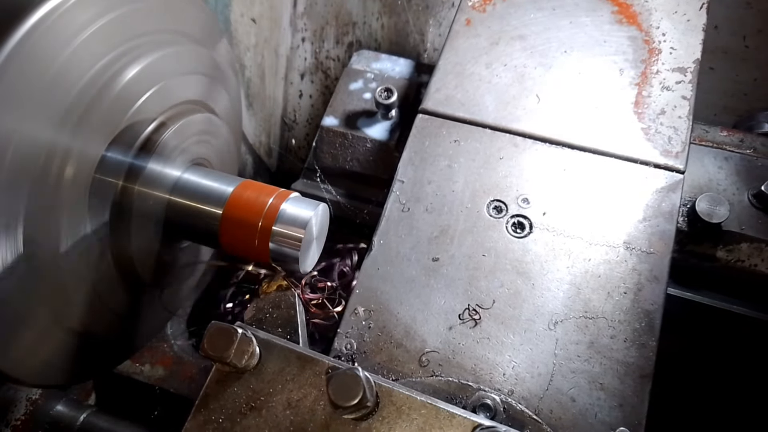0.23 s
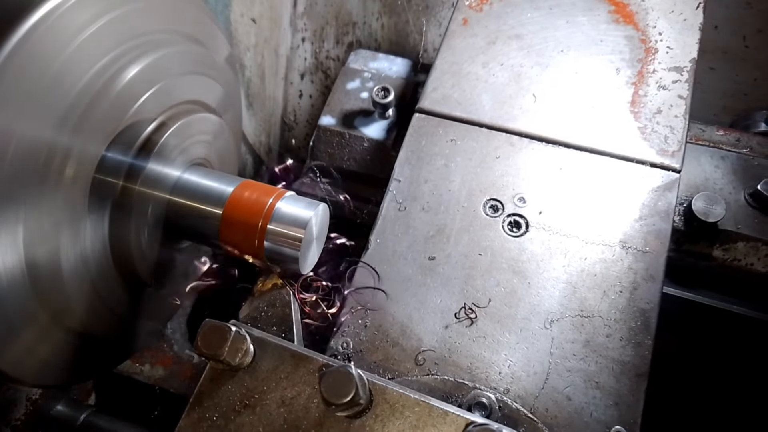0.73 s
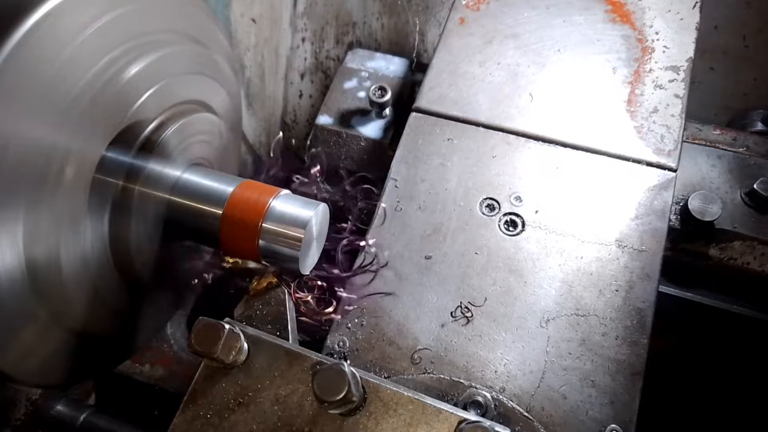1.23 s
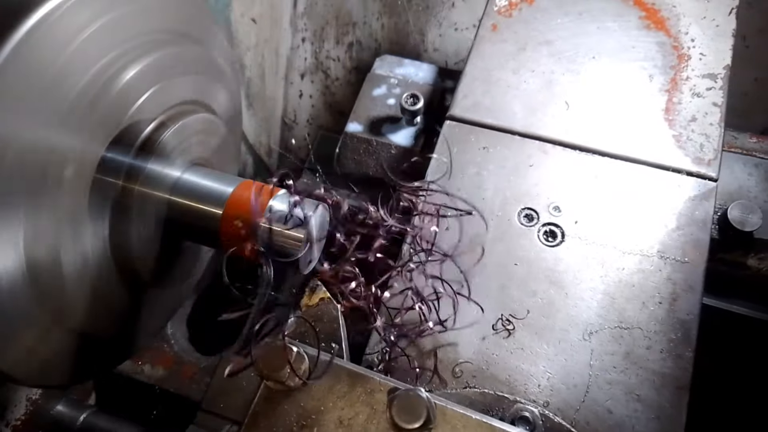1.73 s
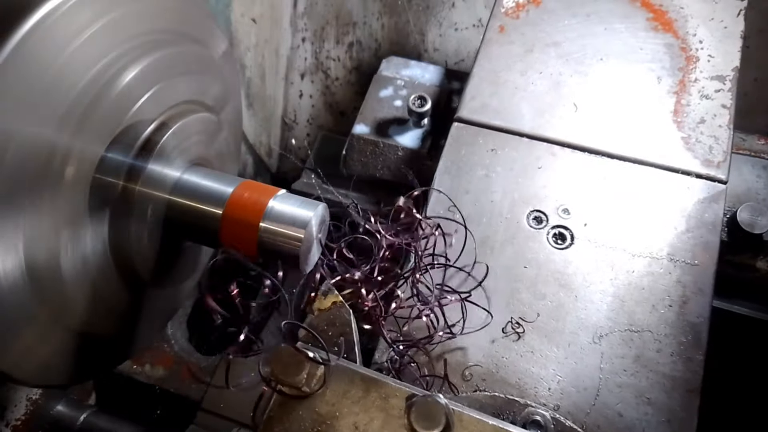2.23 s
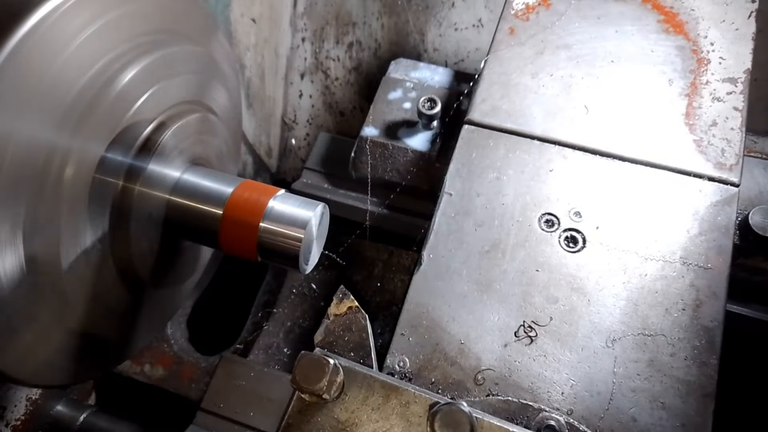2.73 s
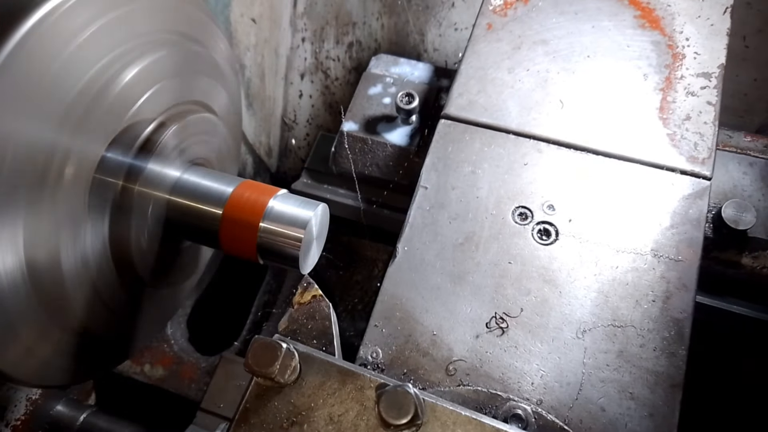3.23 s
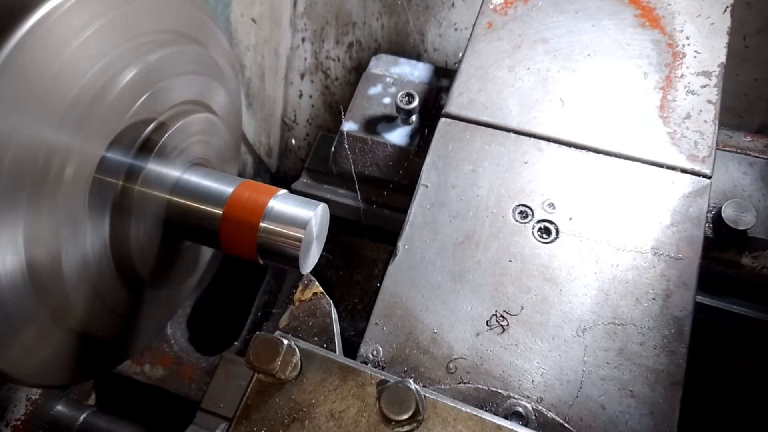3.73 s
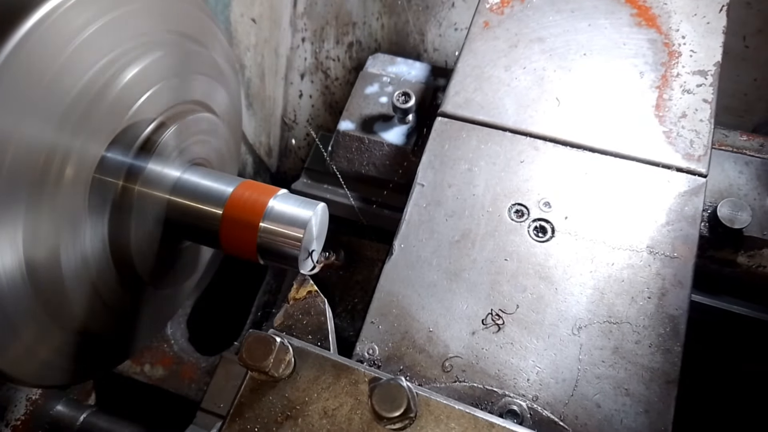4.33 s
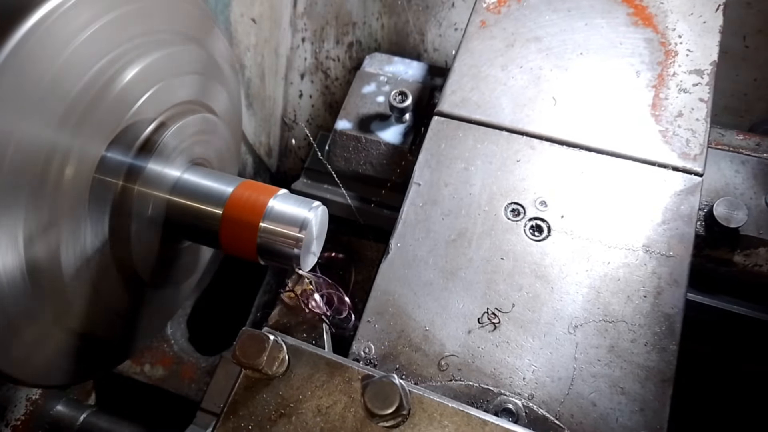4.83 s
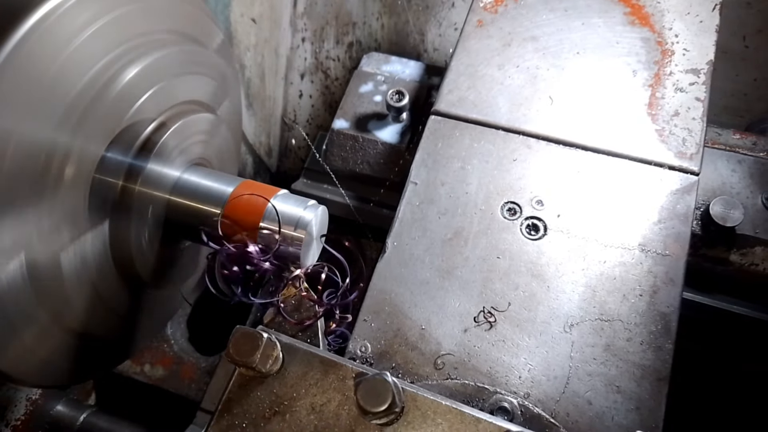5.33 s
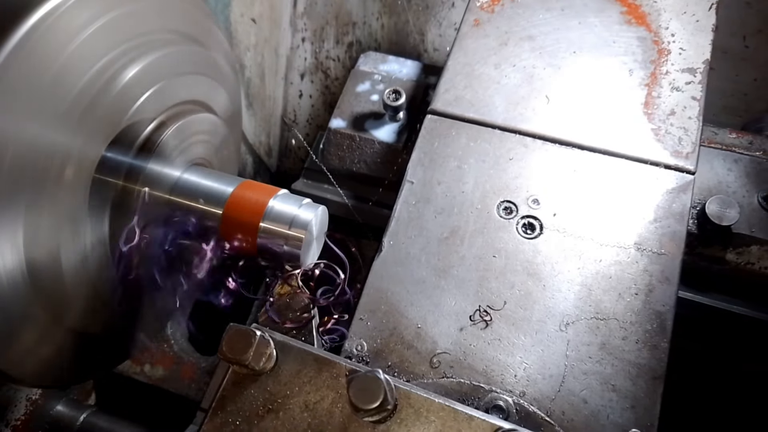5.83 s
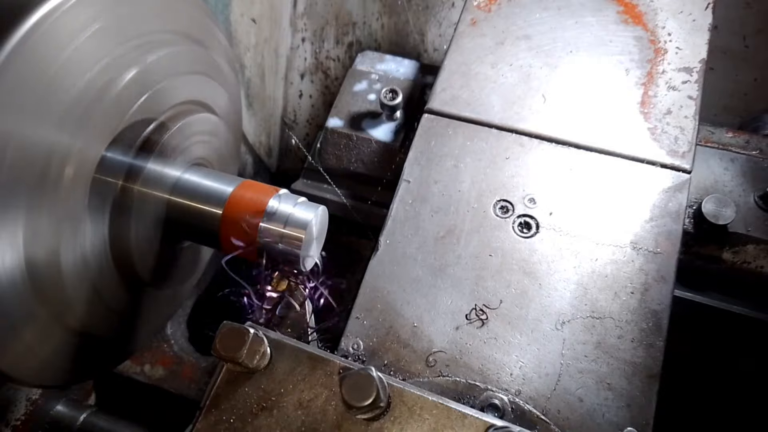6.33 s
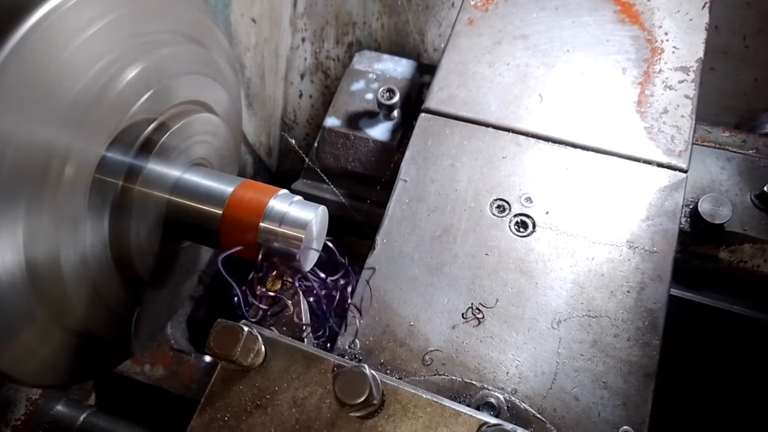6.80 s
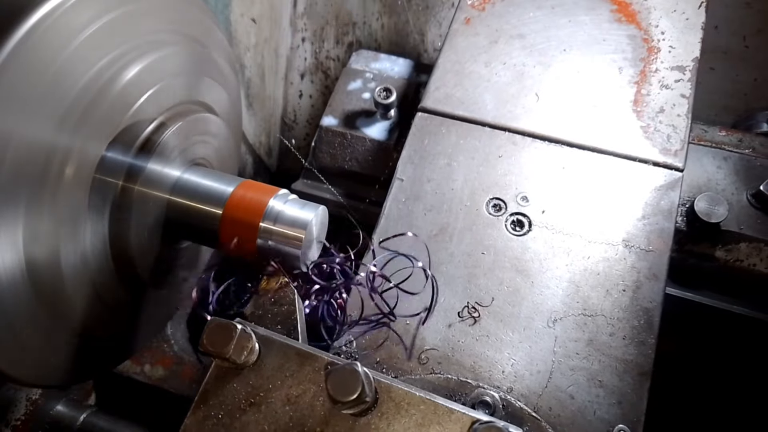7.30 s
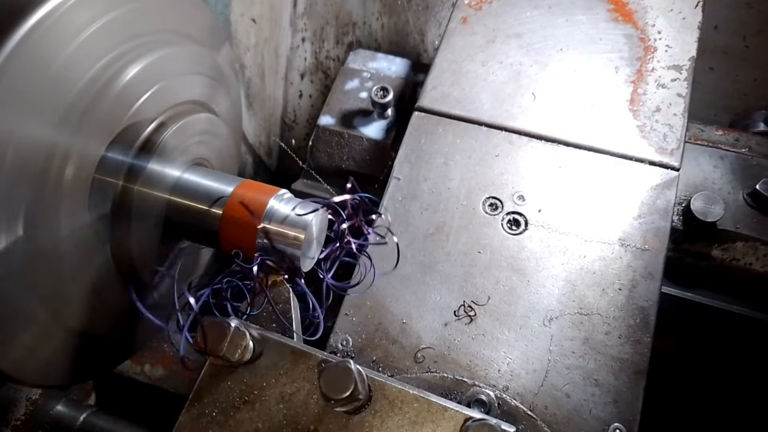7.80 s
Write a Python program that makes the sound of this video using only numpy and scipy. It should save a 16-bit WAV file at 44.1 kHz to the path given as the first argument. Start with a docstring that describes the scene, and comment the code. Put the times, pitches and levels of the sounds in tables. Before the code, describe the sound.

Close microphone on a workshop lathe, centred and without noticeable room echo. Steel shears with dense sizzling friction, gear whine and rapid once-per-turn knocks. Sudden silence is followed by under a second of low, humming machine rumble ending with light swarf ticks. After another short gap the loud, gritty cutting snaps back in, pulsing and ringing, easing slightly late on.

```python
"""Metal lathe turning steel

A lathe heard close up in mono: cutting, a low machine roar of under a second, silence, then cutting again.
Cutting is coloured noise for the chip, sine lines for the gears, and modes struck once a turn for the knock,
with a loose ringing and a few faint thumps. The roar is rumbling noise and hums, with two ticks of swarf.
Both passages of cutting share one sound: the first enters part-way through it, the second plays it whole."""
import sys
import numpy as np
from scipy import signal
from scipy.fft import rfft, irfft
from scipy.io import wavfile

SR = 44100
rng = np.random.default_rng(int(sys.argv[2]) if len(sys.argv) > 2 else 0)


def log_audio(samples):
    """Write samples as a 16-bit WAV file to the path given in sys.argv[1]."""
    # one column per channel
    frames = np.atleast_2d(samples).T
    # limit to full scale, then quantise
    limited = np.clip(frames, -1, 1)
    pcm = np.round(limited * 32767).astype(np.int16)
    wavfile.write(sys.argv[1], SR, pcm)


N = 355443
TIME = np.arange(N + SR) / SR  # s, with a second to spare
FREQ = np.fft.rfftfreq(len(TIME), 1 / SR)  # Hz
SHAFT_HZ = 26.172  # turns per second


def gain_of(db):
    """Decibels to gain."""
    return 10 ** (np.asarray(db) / 20)


def evened(x):
    """Scales to rms 1."""
    return x / np.sqrt(np.mean(x ** 2) + 1e-20)


def filtered(x, gain):
    """Applies a gain given for every frequency."""
    return irfft(rfft(x) * gain, len(x))


def white():
    """White noise of rms 1."""
    return rng.standard_normal(len(TIME))


def wander(hz):
    """Slow random drift of rms 1, with rates up to about hz."""
    t = TIME[::64]
    rate = np.fft.rfftfreq(len(t), t[1])
    drift = filtered(rng.standard_normal(len(t)), np.exp(-(rate / hz) ** 2))
    return np.interp(TIME, t, evened(drift))


def colour(spectrum, resonances):
    """Gain that gives white noise a smooth spectrum with resonant bumps on it."""
    hz, db = np.transpose(spectrum)
    level = np.interp(np.log(FREQ + 1), np.log(hz), db)
    for f, width, lift in resonances:
        level = level + lift / (1 + (2 * (FREQ - f) / width) ** 2)
    return gain_of(level) * np.sqrt(SR / 2)


def lifts(events):
    """A bell-shaped rise in dB for each event; its length is the width at half height."""
    return sum(db * .5 ** ((2 * (TIME - s) / length) ** 2) for s, length, db in events)


def between(start, end):
    """An abrupt gate: 1 inside the span, 0 outside, with 32-sample ramps."""
    return np.clip(np.minimum(TIME - start, end - TIME) * SR / 32, 0, 1)


# base spectrum of the cutting hiss, before resonances and band levels: [f/Hz, level/dB per Hz]
HISS_SPECTRUM = [(25, -82), (65, -83.5), (120, -104), (170, -101), (230, -84), (400, -79.5), (560, -84.5),
                 (850, -79.5), (1050, -71), (1900, -70.5), (2600, -70.5), (5000, -67), (8800, -71),
                 (15500, -74)]
# resonances of bar, tool and chuck that lift the hiss: [f/Hz, width/Hz, lift/dB]
STEEL_RESONANCES = [(1358, 84, 2), (1540, 290, 3), (2108, 57, 6), (2288, 160, 9), (2514, 49, 11),
                    (2660, 102, 8.5), (2760, 130, 4), (2856, 163, 12), (3192, 150, 7), (3304, 57, 5),
                    (3830, 150, 6), (4044, 143, 8), (4335, 250, 5.5), (4620, 53, 9.5), (4800, 195, 4),
                    (5080, 48.7, 6.5), (5240, 92, 3), (5730, 490, 7), (6440, 112, 6.5), (6750, 150, 3.5),
                    (7181, 260, 2.5), (8060, 94, 8.5), (8250, 89, 3.5), (9920, 396, 3.6)]
# level of the steel's ring near 4 kHz, before its waver: [t/s, level/dB]
HIGH_RING_LEVEL = [(4.5, 1), (5.35, 0.5), (5.6, 1), (5.9, 1), (6.35, -0.5), (6.75, 1), (7.05, 0.5),
                   (7.3, 2.5), (7.8, 1.5), (8.4, 0.5)]


def chip(turns, flutter_db=0.36, bite_db=2.7, low_ring_db=0.68, low_waver_db=0.6,
         high_waver_db=0.34, treble_db=-0.3, treble_waver_db=0.24):
    """Shearing steel: dense friction noise rings the bar and the tool, unevenly as the chip curls."""
    friction = white() * gain_of(flutter_db * wander(45))
    hiss = filtered(friction, colour(HISS_SPECTRUM, STEEL_RESONANCES))
    low_db = low_ring_db + low_waver_db * wander(22)
    high_db = np.interp(TIME, *np.transpose(HIGH_RING_LEVEL)) + high_waver_db * wander(4.7)
    # the fizz is strongest at each blow of the shaft, then fades over the turn
    bite = np.exp(-(turns % 1) / 0.34) - .25
    fizz_db = treble_db + treble_waver_db * wander(8) + bite_db * bite
    # overlapping bands that add up to the whole hiss
    centres_hz = [2200, 2800, 4050, 5000]
    shares = np.eye(len(centres_hz))
    bands = [filtered(hiss, np.interp(FREQ, centres_hz, share)) for share in shares]
    return sum(band * gain_of(db) for band, db in zip(bands, [0, low_db, high_db, fizz_db]))


MESH_HZ = 153.13  # tooth rate
# gear whine, before the whine trim: [multiple of the tooth rate, rms level/dB]
GEAR_LINES = [(6, -56.9), (9, -46.7), (11, -50.2), (12, -50.6), (13, -53.0), (15, -50.2), (17, -52.2),
              (18, -44.4), (19, -47.6), (21, -44.9), (25, -49.8), (26, -47.2), (27, -38.9), (31, -45.3),
              (32, -54.9), (33, -44.7), (37, -50.8), (38, -49.0), (48, -58.9), (53, -53.1), (54, -47.1),
              (65, -55.6), (66, -58.4), (67, -58.8), (71, -58.1), (81, -59.4)]
# hums and thin whistles of the drive, before the whine trim: [f/Hz, rms level/dB]
DRIVE_WHISTLES = [(231, -65.5), (249, -66), (366.4, -58), (497.3, -65), (575.8, -64), (654.3, -64.5),
                  (1908, -58), (2467, -58.5), (3005, -48), (4007, -45), (8032, -52), (8058.5, -52),
                  (8084.5, -53), (8110.5, -54.5)]


def whine(clock, waver_db=2., slip_cycles=.06, trim_db=.5):
    """Gear teeth mesh at a steady rate; every line wavers in strength and phase, high ones more in phase."""
    gears = [(k * MESH_HZ, db) for k, db in GEAR_LINES]
    out = 0
    for hz, db in [*gears, *DRIVE_WHISTLES]:
        slip = slip_cycles * np.sqrt(hz / 4000) * wander(5.5)
        cycles = hz * clock + slip + rng.random()
        strength = evened(gain_of(waver_db * wander(14)))
        out = out + gain_of(db + trim_db) * strength * np.sin(2 * np.pi * cycles)
    return np.sqrt(2) * out  # sine peak to rms


# the knock swells and eases a few times a second, and weakens late in the cut
SWELL_HZ, SWELL_AT_S, SWELL_DB = 2.93, 4.765, 0.45
EASE_FROM_S, EASE_DB_PER_S = 6.85, 0.9
# modes the shaft's knock rings, before the force of the blow:
# [f/Hz, rms level/dB, delay of the peak/s, bell half length (one sigma)/s]
KNOCK_MODES = [(403, -57, 0.0068, .0035), (745, -61, 0.00702, 0.00091), (872, -64.5, 0.00684, 0.0022),
               (1114, -42.5, .007, 0.0028), (1060, -55, .017, 0.0015), (1296, -49, .007, 0.0045),
               (1402, -55, 0.00511, 0.0017), (1533, -51, .01, 0.0022), (1967, -53, 0.0063, 0.0046)]


def knock(turns, uneven_db=1.1, trim_db=-0.34):
    """Once a turn the shaft knocks; each mode of the headstock swells and dies within the turn."""
    swell_db = SWELL_DB * np.cos(2 * np.pi * SWELL_HZ * (TIME - SWELL_AT_S))
    ease_db = EASE_DB_PER_S * np.maximum(TIME - EASE_FROM_S, 0)
    force = gain_of(trim_db + swell_db - ease_db + uneven_db * wander(27))
    blows = np.diff(np.floor(turns), prepend=np.floor(turns[0])) * force
    t = np.arange(-SR // 20, SR // 20) / SR
    ring = 0
    for hz, db, delay, length in KNOCK_MODES:
        bell = np.exp(-.5 * ((t - delay) / length) ** 2)
        mode = bell * np.cos(2 * np.pi * hz * (t - delay))
        ring = ring + gain_of(db) * mode / np.linalg.norm(mode)
    # scaled so that one blow a turn gives the rms levels of the table
    return signal.oaconvolve(blows, ring * np.sqrt(SR / SHAFT_HZ), "same")


# bouts in which the loose part rings louder: [middle t/s, length/s, lift/dB]
PING_BOUTS = [(4.5, .08, 6), (4.88, .12, 7.5), (5.12, .12, 5), (5.29, 0.071, 4), (5.79, .2, 7),
              (6.04, .15, 6.5), (6.39, .1, 7), (6.68, 0.071, 8), (6.87, .12, 8.5), (7.28, 0.1, 9),
              (7.54, .18, 4.5), (8.0, .11, 7.5), (8.27, .1, 4.5)]


def ping(turns, ping_hz=2160, ping_db=-43.5, peak_turn=.25, length_turns=.14, uneven_db=2.5,
         slip_cycles=0.054):
    """Something loose rings once a turn, in bouts, with chance changes of level and phase."""
    from_peak = (turns - peak_turn + .5) % 1 - .5  # turns
    swell = evened(np.exp(-.5 * (from_peak / length_turns) ** 2))
    cycles = ping_hz * from_peak / SHAFT_HZ + slip_cycles * wander(25)
    tone = np.sqrt(2) * np.cos(2 * np.pi * cycles)
    level_db = ping_db + lifts(PING_BOUTS) + uneven_db * wander(18)
    return gain_of(level_db) * swell * tone


# soft thumps under the cutting: [t/s, envelope peak level/dB]
SOFT_THUMPS = [(7.025, -52), (7.32, -57.5), (7.59, -50.5)]


def thumps(thump_hz=115, length_s=0.0032):
    """Now and then a dull, faint thump: a low sine inside a short bell."""
    out = 0
    for s, db in SOFT_THUMPS:
        bell = np.exp(-.5 * ((TIME - s) / length_s) ** 2)
        out = out + gain_of(db) * bell * np.sin(2 * np.pi * thump_hz * (TIME - s))
    return out


# shape of the low roar, levelled later: [f/Hz, relative level/dB per Hz]
ROAR_SPECTRUM = [(25, -54), (55, -67.5), (130, -53.5), (220, -53.5), (400, -56.5), (600, -53.5),
                 (1000, -55.0), (2000, -65.5), (2600, -70), (4400, -75.5), (5200, -81), (7500, -83),
                 (12500, -104.5), (15500, -91)]
# resonances of the housing that lift the roar: [f/Hz, width/Hz, lift/dB]
HOUSING_RESONANCES = [(280, 48, 6), (334, 34, 8), (430.7, 72, 15.5), (508, 31, 11.5), (744, 24, 5.5),
                      (807, 53, 6.5), (870, 36, 3), (1020, 38, 4.5), (1185, 49, 5), (1345, 14, 6.5),
                      (1610, 40, 6.5), (1697, 86, 3.5), (2010, 96, 5)]
# hums within the roar, before waver and surges: [f/Hz, rms level/dB]
ROAR_HUMS = [(290, -35), (452, -32), (526, -32.5), (747, -37.5), (806, -38.5), (874, -38.5)]
# surges of the roar: [middle t/s, length/s, lift/dB]
ROAR_SURGES = [(3.215, 0.033, 2.5), (3.262, 0.026, 4), (3.335, 0.038, 4.5), (3.478, 0.019, 3.5),
               (3.525, 0.019, 6), (3.645, 0.019, 7), (3.735, 0.036, 2), (3.785, 0.023, 1),
               (3.83, 0.044, 4.5)]


def roar(judder_db=0.95, judder_hz=24, body_db=-19.5, body_hz=900, rush_db=-18.5, waver_db=2.0,
         slip_cycles=0.14):
    """The running machine rumbles and hums through its housing, surging and juddering."""
    noise = evened(filtered(white(), colour(ROAR_SPECTRUM, HOUSING_RESONANCES)))
    low = filtered(noise, 1 / (1 + (FREQ / body_hz) ** 4))
    # the body and the hums surge; the rush above them stays even
    surge_db = lifts(ROAR_SURGES)
    judder = evened(gain_of(judder_db * wander(judder_hz)))
    body = low * gain_of(body_db + surge_db) * judder
    rush = (noise - low) * gain_of(rush_db)
    hums = 0
    for hz, db in ROAR_HUMS:
        cycles = hz * TIME + slip_cycles * wander(5.9) + rng.random()
        hums = hums + gain_of(db + waver_db * wander(13)) * np.sin(2 * np.pi * cycles)
    return body + rush + np.sqrt(2) * hums * gain_of(surge_db)


# light ticks of swarf over the roar: [t/s, rms level at onset/dB of the band-limited noise, t60/s]
SWARF_TICKS = [(3.954, -24.5, 0.036), (4.001, -32, 0.04)]


def ticks(centre_hz=3000, width_hz=3500):
    """Bits of swarf land: short bright noise bursts that start at once and die away."""
    bright = evened(filtered(white(), 1 / (1 + ((FREQ - centre_hz) / width_hz) ** 2)))
    envelope = 0
    for s, db, t60 in SWARF_TICKS:
        envelope = envelope + (TIME > s) * gain_of(db - 60 * abs(TIME - s) / t60)
    return bright * envelope


CUT_FROM_S, CUT_TO_S = 4.4705, 8.4685
CUT_EARLIER_S = 5.352  # how much sooner the first hearing comes
ROAR_FROM_S, ROAR_TO_S = 3.1455, 4.0165
KNOCK_AT_S = .0134  # sets where in the turn the shaft knocks
# steady offset under each stretch of sound (share of full scale)
CUT_OFFSET, ROAR_OFFSET = -.0096, -.026


def scene():
    """The cutting is heard twice, with the roar and a silence between."""
    clock = TIME + 5e-5 * wander(1.2)  # the load makes the drive run slightly ahead or behind
    turns = (clock - KNOCK_AT_S) * SHAFT_HZ
    cutting = chip(turns) + whine(clock) + knock(turns) + ping(turns) + thumps() + CUT_OFFSET
    cutting = cutting * between(CUT_FROM_S, CUT_TO_S)
    earlier = np.pad(cutting, (0, N))[round(CUT_EARLIER_S * SR):]
    rumble = (roar() + ticks() + ROAR_OFFSET) * between(ROAR_FROM_S, ROAR_TO_S)
    mono = earlier[:N] + rumble[:N] + cutting[:N]
    return np.array([mono, mono])


def record(dry, edge_hz=15750):
    """A steep low-pass takes off the extreme treble."""
    low_pass = signal.firwin(801, edge_hz, window=("kaiser", 9), fs=SR)
    return signal.oaconvolve(dry, low_pass[None], "same")


dry = scene()
out = record(dry)
log_audio(out)
```